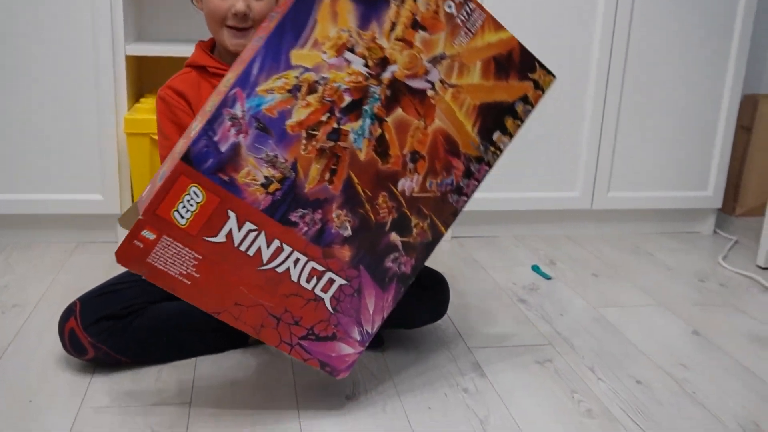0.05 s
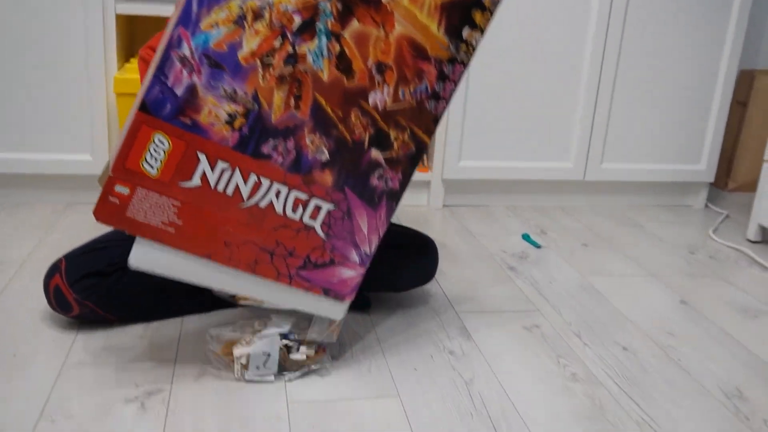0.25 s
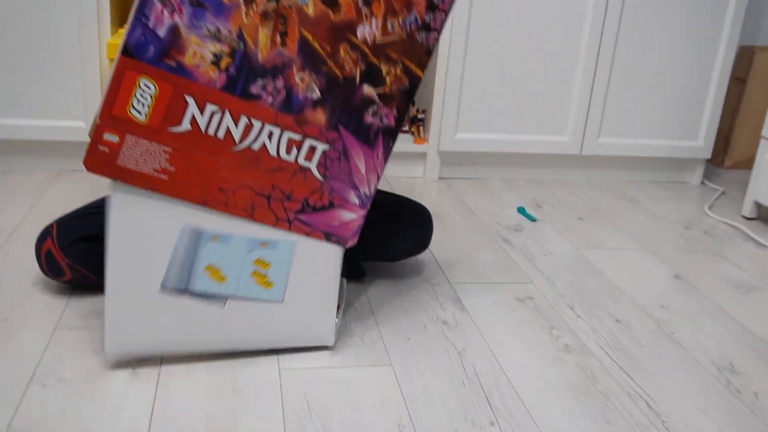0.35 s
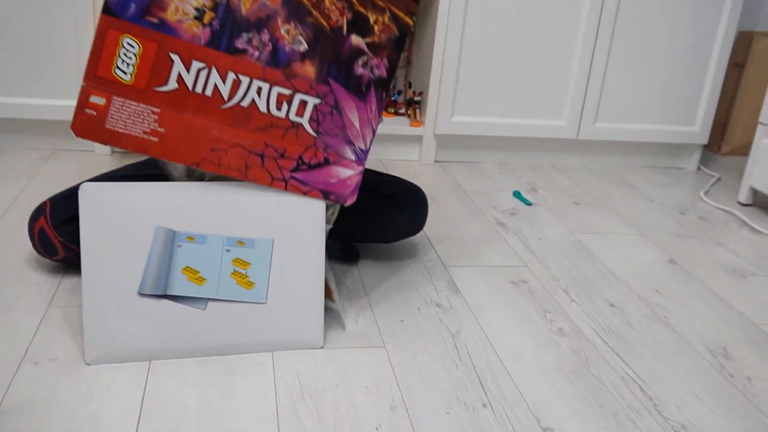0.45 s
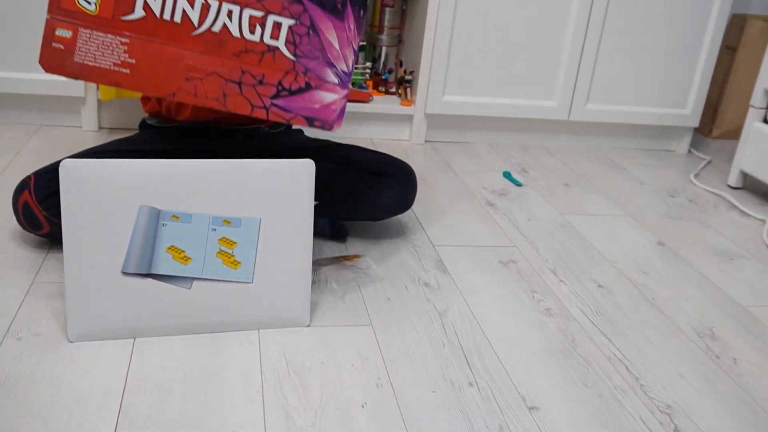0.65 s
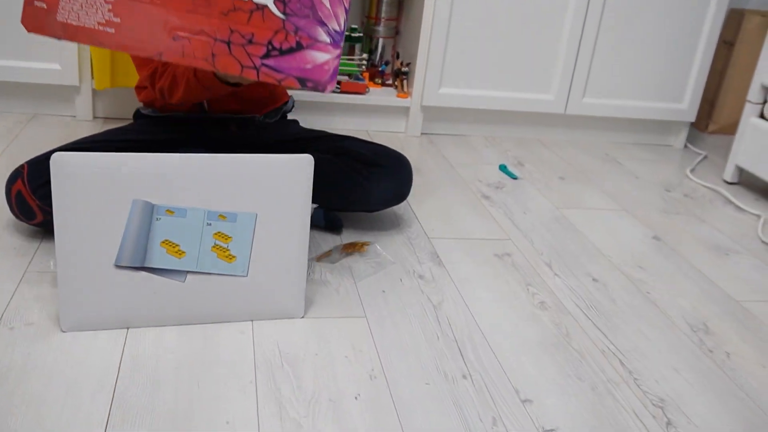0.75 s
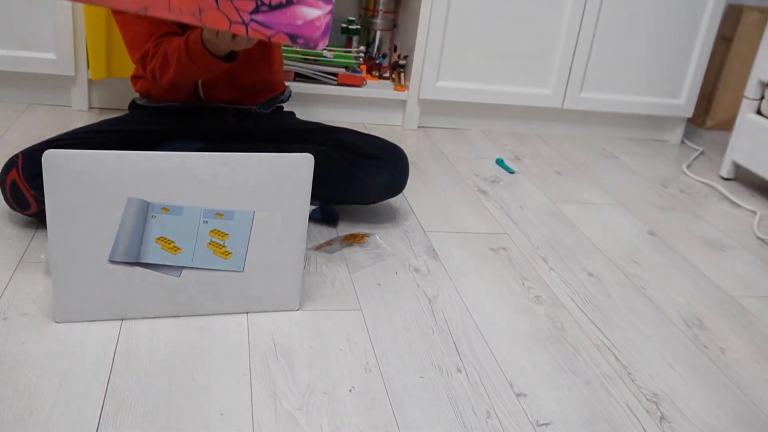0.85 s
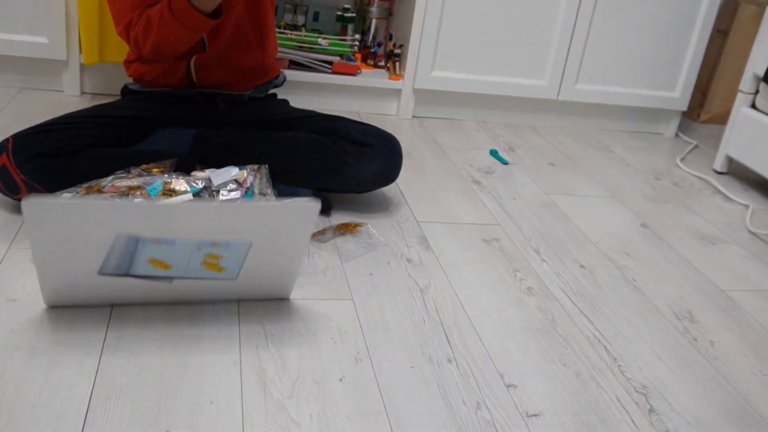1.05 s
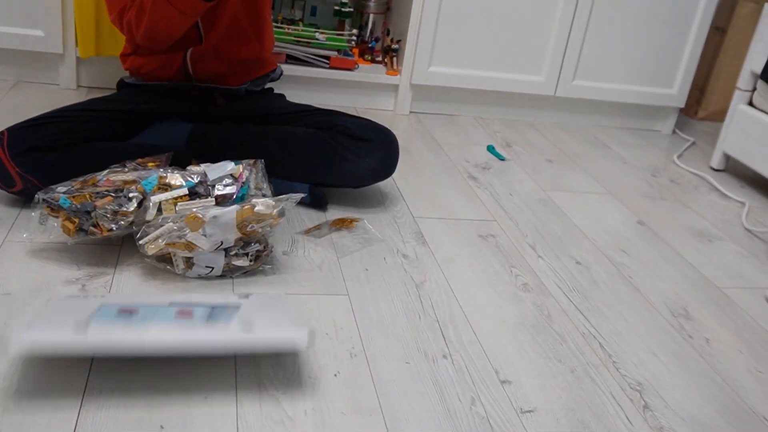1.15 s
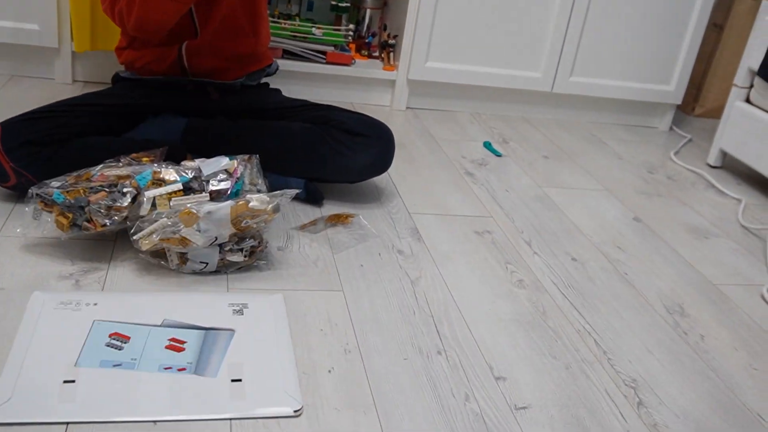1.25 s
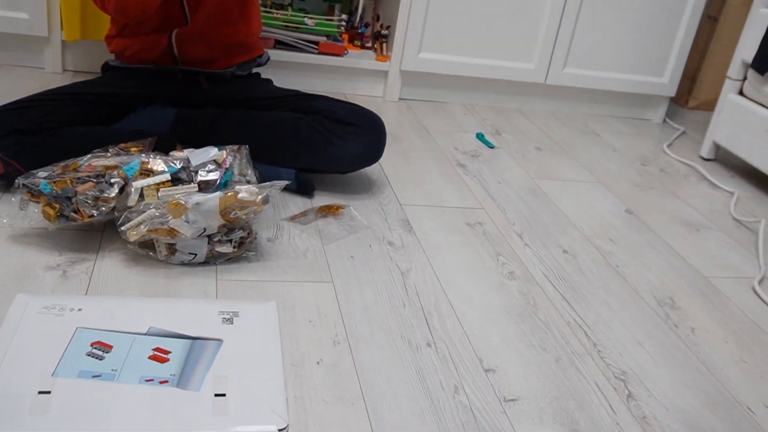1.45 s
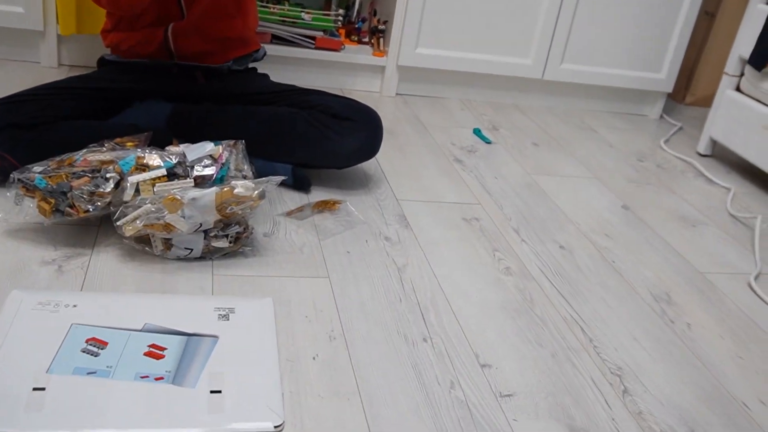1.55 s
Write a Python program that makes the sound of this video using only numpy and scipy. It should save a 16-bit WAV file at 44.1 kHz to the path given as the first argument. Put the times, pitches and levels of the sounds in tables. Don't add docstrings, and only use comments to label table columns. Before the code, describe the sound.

Plastic bags of small building pieces spill out of a carton with a crackling rattle and cardboard knocks, ticks fade, then a hollow inner box slaps flat on a hard floor in a lively room, close microphone.

```python
import sys
import numpy as np
from scipy import signal
from scipy.io import wavfile
from scipy.ndimage import uniform_filter1d

SR = 44100
rng = np.random.default_rng(int(sys.argv[2]) if len(sys.argv) > 2 else 0)


def file_out(sig):
    cols = np.atleast_2d(sig).T
    lim = np.clip(cols, -1, 1)
    pcm = np.round(lim * 32767).astype(np.int16)
    wavfile.write(sys.argv[1], SR, pcm)


def gain_from_db(level_db):
    decades = np.asarray(level_db, float) / 20
    return 10 ** decades


N = 70560


def in_time(rows):
    start_s, level_db, *rest = np.transpose(rows)
    t = np.arange(N) / SR
    fade_db = -600 * np.maximum(t - start_s[-1], 0)
    return [np.interp(t, start_s, level_db) + fade_db] + [np.interp(t, start_s, c) for c in rest]


def at_hz(points, hz):
    table_hz, value = np.transpose(points)
    return np.interp(np.log(hz), np.log(table_hz), value)


def rms_one(x):
    return x / np.sqrt(np.mean(x ** 2) + 1e-20)


def filtered(x, order, hz, kind="low"):
    return signal.sosfilt(signal.butter(order, hz, kind, fs=SR, output="sos"), x)


def ring(clicks, hz, t60_s):
    radius = gain_from_db(-60 / (t60_s * SR))
    w = 2 * np.pi * min(hz, .45 * SR) / SR
    return signal.lfilter([0, np.sin(w)], [1, -2 * radius * np.cos(w), radius ** 2], clicks + 1e-18)


def grains(spectrum, per_s, cycles, spread_db, dull_db_per_oct, count):
    sizes = gain_from_db(spread_db * np.minimum(rng.exponential(1, N), 4)) * rng.choice([-1, 1], N)
    clicks = sizes * (rng.random(N) < per_s / SR)
    dealt = rng.integers(0, count, N)
    pitches_hz = np.geomspace(spectrum[0][0], spectrum[-1][0], count)
    weights = gain_from_db(at_hz(spectrum, pitches_hz)) * np.sqrt(pitches_hz)
    weights = weights / np.sqrt(np.sum(weights ** 2))
    out = np.zeros(N)
    for k, (hz, share) in enumerate(zip(pitches_hz, weights)):
        tilt = gain_from_db(-dull_db_per_oct * np.log2(hz / 4000))
        out += share * tilt * rms_one(ring(clicks * (dealt == k), hz, cycles / hz))
    return out


# start_s, level_db, dullness_db_per_oct
TUMBLE_ROWS = [(0, -33, 2.5), (.03, -44.5, 3), (.075, -45, 1), (.09, -41.5, 6.5), (.14, -36, 4.5),
               (.2, -34, 5.5), (.28, -21, -2), (.32, -20.5, -5), (.364, -25.5, 0.5), (.44, -24.5, 0.5),
               (.462, -28.5, -1), (.544, -24, 0.5), (.618, -28, 1.5), (.696, -23.5, -1), (.78, -35, 2),
               (.866, -39, 0.5), (.89, -35, 0), (.97, -56.5, 5.5)]
# pitch_hz, level_db_per_hz
RATTLE_SPECTRUM = [(530, -17), (900, -8), (1600, -1.5), (3000, -2.5), (4500, 2), (6500, -0.5),
                   (11400, -15.5), (16000, -53)]


def tumble():
    level_db, dull_db_per_oct = in_time(TUMBLE_ROWS)
    rattle = grains(RATTLE_SPECTRUM, per_s=5000, cycles=12.5, spread_db=0.5,
                    dull_db_per_oct=dull_db_per_oct, count=28)
    return gain_from_db(level_db - 2) * rattle


# start_s, level_db
WEIGHT_ROWS = [(.05, -86), (.085, -72), (.2, -41), (.3, -23), (.35, -24), (.4, -18.5), (.445, -24.5),
               (.465, -17.5), (.495, -16), (.515, -29), (.57, -29), (.63, -27.5), (.69, -27), (.76, -37),
               (.9, -51.5)]
# pitch_hz, level_db_per_hz
BUMP_SPECTRUM = [(47, -68.5), (80, 12), (292, -1), (513, -23), (837, 8), (912, 12.5), (2500, -25.5),
                 (3250, -28), (5500, -120)]


def weight():
    level_db, = in_time(WEIGHT_ROWS)
    bumps = grains(BUMP_SPECTRUM, per_s=1600, cycles=3.1, spread_db=2, dull_db_per_oct=0, count=18)
    return gain_from_db(level_db - 6) * bumps


def scattered(x):
    places, hold_samples = 5, 900
    spot = rng.integers(0, places, N // hold_samples + 1).repeat(hold_samples)[:N]
    return sum(room(x * uniform_filter1d(1. * (spot == k), size=200)) for k in range(places))


# start_s, peak_db, pitch_hz, treble_db, snap_db
TICK_ROWS = [(0.0548, -18.5, 2760, -40, -19), (0.0837, -13.5, 2520, -28, 8),
             (0.1565, -14.5, 2870, -9.5, -3), (0.2442, -8, 3270, -30, -6), (0.2621, -7.5, 4320, -41, 6),
             (0.2904, -11, 3900, -24, 1), (0.3027, -5, 5460, -24, -2), (0.3147, -2.5, 4850, -40, -3),
             (0.318, -18, 4300, -25, 0), (0.3229, -2, 6000, -22, 4), (0.345, -22, 5200, -3, 0),
             (0.394, -6, 5340, -25, -5), (0.407, -3.5, 4380, -13, 7), (0.4237, -8.5, 4870, -28, 1),
             (0.6637, -7, 1600, -25, 5.5), (0.696, -23.5, 4500, -20, 1), (0.8877, -18.5, 4430, -17, 1.5),
             (1.0015, -21, 3840, -28, -10), (1.007, -23, 1480, -18.5, 6.5), (1.016, -30, 2550, -20.5, 6),
             (1.063, -23.5, 3400, -36, 2.5), (1.0666, -31.5, 3670, -16, 7.5), (1.0775, -47, 3000, -25, -1),
             (1.108, -55, 3020, -33, -7.5), (1.141, -48.5, 3140, -42, 4), (1.1815, -59.5, 4000, -39, -1),
             (1.1958, -23.5, 3350, -18.5, 2), (1.205, -30.5, 3320, -26, 2.5), (1.2444, -26, 2300, -32, -3),
             (1.4863, -25, 5510, -42, 12.5), (1.498, -52.5, 4430, -43, -10), (1.5207, -37, 4400, -29, 9),
             (1.5687, -31.5, 2280, -43, -15), (1.587, -48, 1704, -44, -3)]


def tick_body(drive, pitch_hz, treble_db, snap_db):
    cycles, split_hz = 9, 6900
    modes = .5 * ring(drive, pitch_hz, cycles / pitch_hz)
    modes += 0.26 * ring(drive, 1.43 * pitch_hz, cycles / pitch_hz)
    dull = filtered(drive, 4, split_hz)
    sharp = filtered(drive, 2, split_hz, "high")
    snap = gain_from_db(snap_db + 4.5) * (dull - gain_from_db(treble_db + 18) * sharp)
    return filtered(filtered(modes, 2, 1.5 * split_hz) + snap, 3, [1355, 11400], "band")


def ticks():
    length, chatter_s, room_db = 1500, .0038, 23
    near_far = np.zeros((2, N + SR))
    t = np.arange(length) / SR
    blow = gain_from_db(room_db) * (t == 0)
    for start_s, peak_db, *piece in TICK_ROWS:
        chatter = rng.standard_normal(length) * np.exp(-(t / chatter_s) ** 2)
        near, far = tick_body(chatter, *piece), tick_body(blow, *piece)
        i = int(start_s * SR)
        near_far[:, i:i + length] += gain_from_db(peak_db - 6.5) * np.array([near, far]) / np.abs(near).max()
    return room(*near_far[:, :N], first_s=0.001)


# pitch_hz, level_db, t60_s
BOX_MODES = [(200, -5, 0.031), (376, 4, 0.024), (583, -4.5, 0.0096), (845, -0.5, 0.032),
             (1203, -7.5, 0.039), (1730, 5.5, 0.0015), (2200, -13, 0.0034)]


def box_blows(rows, low_share, ring_db):
    length, strike_db, pulse_db, luck_db = 4000, -13, 20, 2
    out = np.zeros(N + SR)
    for start_s, peak_db, bright_hz in rows:
        blow = np.zeros(length)
        blow[0] = -gain_from_db(peak_db + strike_db)
        blow = filtered(blow, 2, min(bright_hz, .4 * SR))
        pulse = filtered(blow, 2, low_share * bright_hz, "high") * SR / bright_hz / 4
        i = int(start_s * SR)
        out[i:i + length] += pulse * gain_from_db(pulse_db)
        for (hz, db, t60_s), luck in zip(BOX_MODES, rng.standard_normal(len(BOX_MODES))):
            out[i:i + length] += gain_from_db(db + ring_db + luck_db * luck) * ring(blow, hz, t60_s)
    return out[:N]


# start_s, peak_db, bright_hz
KNOCK_ROWS = [(.084, -35.5, 868), (.26, -29, 950), (.311, -9.5, 1490), (.394, -6, 1240), (.407, -19, 1240),
              (.423, -14.5, 1000), (.4511, 2, 1550), (.4538, -13, 700), (.4585, -1, 1290),
              (.468, -30.5, 1200), (.472, -19.5, 1196), (.476, -11.5, 800), (.482, -23, 1560),
              (.490, -12.5, 1550), (.4975, -14.5, 1490), (.68, -20, 596), (1.002, -37, 1510),
              (1.063, -42.5, 600), (1.141, -51, 900), (1.196, -51.5, 887)]


def knocks():
    blows = box_blows(KNOCK_ROWS, low_share=0.16, ring_db=-5.5)
    return room(blows, gain_from_db(-3.5) * blows)


# start_s, peak_db, bright_hz
SLAP_ROWS = [
    (1.2715, -35, 2900),
    (1.2721, -1, 1970),
    (1.2738, -22, 1580),
    (1.2845, -17, 1740),
    (1.2901, -23, 1900),
]
# pitch_hz, level_db_per_hz
SLAP_COLOUR_DB = [(100, -38), (200, 7.5), (283, 7.5), (570, -4.5), (810, 7.5), (1160, 1), (1640, 9.5),
                  (2750, 0), (5510, -3.5), (15000, -27.5)]
# pitch_hz, level_db, t60_s
PANEL_MODES = [(207.6, -20, 0.15), (304, -20, 0.24), (348, -22, 0.3), (840, -33, 0.13), (1700, -29.5, 0.17),
               (1880, -40, 0.24)]


def slap():
    puff_db, puff_s, puff_hz, hum_rise_s, room_db = -9.5, 0.0094, 2430, 0.011, 14.5
    t = np.arange(N) / SR - SLAP_ROWS[0][0]
    puff = filtered(rng.standard_normal(N), 2, puff_hz) * (t > 0) * np.exp(-np.abs(t) / puff_s)
    blow = np.diff(1. * (t > 0), prepend=0)
    soft_blow = uniform_filter1d(blow, size=9)
    hum = sum(gain_from_db(db) * ring(soft_blow, hz, t60_s) for hz, db, t60_s in PANEL_MODES)
    hum = hum * (1 - np.exp(-np.abs(t) / hum_rise_s))
    near = box_blows(SLAP_ROWS, low_share=0.33, ring_db=-1.5) + gain_from_db(puff_db) * puff
    return hum + room(near, gain_from_db(room_db) * blow, SLAP_COLOUR_DB)


def boom():
    mode_hz, mode_t60_s, from_s, load_db, slap_db, slap_s = 101, 0.19, .25, -13, -25.5, 0.037
    level_db, = in_time(WEIGHT_ROWS)
    t = np.arange(N) / SR
    load = np.clip((t - from_s) / .02, 0, 1) * gain_from_db(level_db + load_db)
    after = np.maximum(t - SLAP_ROWS[0][0], 0) / slap_s
    stir = load + gain_from_db(slap_db) * after * np.exp(-after)
    return stir * rms_one(ring(rng.standard_normal(N), mode_hz, mode_t60_s))


EDGES_HZ = 60 * 2 ** np.arange(0, 8.4, .5)


def bands(x):
    for k, (low_hz, high_hz) in enumerate(zip(EDGES_HZ, EDGES_HZ[1:])):
        yield np.sqrt(low_hz * high_hz), filtered(x[k % len(x)], 2, [low_hz, high_hz], "band")


# pitch_hz, t60_s
ROOM_T60_S = [(150, 0.27), (290, 0.32), (570, 0.27), (1100, 0.24), (1700, 0.35), (3200, 0.36), (7000, 0.32),
              (14000, 0.24)]
# pitch_hz, level_db
ROOM_COLOUR_DB = [(150, -1.5), (350, -1.5), (700, -0.5), (1700, -1), (5000, -0.45), (14000, 0.5)]
# pitch_hz, side_minus_mid_db
WIDTH_DB = [(60, -56.5), (110, -36.5), (200, -30), (380, -23), (700, -19), (1290, -21.5), (2380, -14.5),
            (4400, -11.5), (8120, -7.5), (15000, -1.5)]


def room(x, far=None, colour=ROOM_COLOUR_DB, first_s=.005):
    grow_s, room_db, more_width_db, near_width_db = .005, 3, 2.5, -7
    t = np.arange(SR * 6 // 10) / SR
    late = np.maximum(t - first_s, 0)
    mid, side = np.zeros((2, len(t)))
    for hz, pair in bands(rng.standard_normal((2, 2, len(t)))):
        t60_s = at_hz(ROOM_T60_S, hz)
        decay = gain_from_db(-60 * late / t60_s + at_hz(colour, hz) + room_db)
        tail = pair * (1 - np.exp(-late / grow_s)) * decay / np.sqrt(t60_s * SR / 14)
        mid += tail[0]
        side += tail[1] * gain_from_db(at_hz(WIDTH_DB, hz) + more_width_db)
    far = x if far is None else far
    skew = np.gradient(x) * gain_from_db(near_width_db)
    return np.array([x + sign * skew + signal.fftconvolve(far, mid + sign * side)[:N] for sign in (1, -1)])


# pitch_hz, level_db_per_hz
FLOOR_SPECTRUM = [(100, -17.5), (300, -12.5), (1000, -17), (3000, -4), (6000, 1), (10000, -10),
                  (13000, -13)]


def floor():
    level_db, top_hz = -72, 12200
    hiss = np.zeros((2, N))
    for hz, (mid, side) in bands(rng.standard_normal((2, 2, N))):
        spread = gain_from_db(at_hz(WIDTH_DB, hz)) * side * np.array([[1], [-1]])
        hiss += gain_from_db(at_hz(FLOOR_SPECTRUM, hz)) * (mid + spread)
    low_pass = signal.cheby1(8, 1, top_hz, fs=SR, output="sos")
    return gain_from_db(level_db) * rms_one(signal.sosfilt(low_pass, hiss))


def scene():
    heap = scattered(tumble() + weight())
    return heap + ticks() + knocks() + slap() + boom() + floor()


def top_cut(x):
    return signal.sosfilt(signal.butter(12, 16510, fs=SR, output="sos"), x)


def record(dry):
    top, low_cut_hz, bass_leak_db, top_cut_hz = 0.89, 224, -46, 15850
    rounded = top * np.tanh(dry / top)
    thin = filtered(rounded, 4, low_cut_hz, "high") + gain_from_db(bass_leak_db) * rounded
    mix = signal.sosfilt(signal.cheby1(14, 1, top_cut_hz, fs=SR, output="sos"), thin)
    return top_cut(mix)


dry = scene()
out = record(dry)
file_out(out)
```